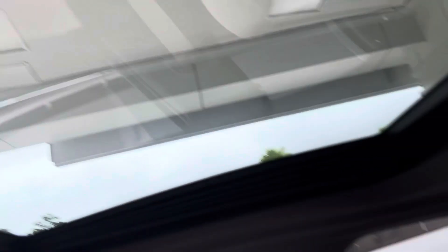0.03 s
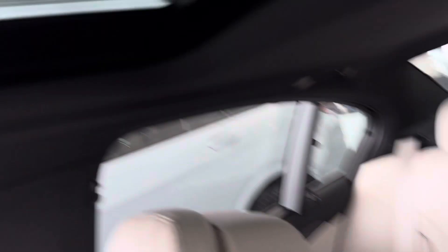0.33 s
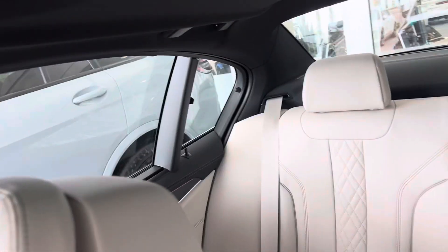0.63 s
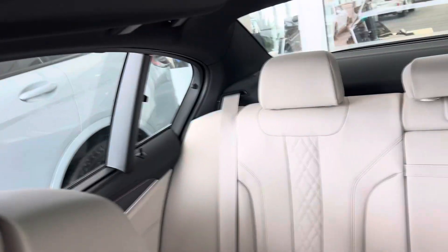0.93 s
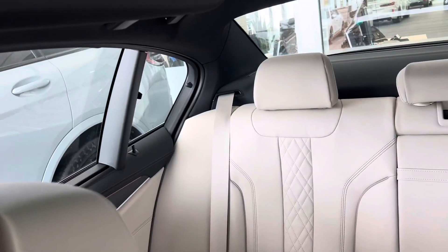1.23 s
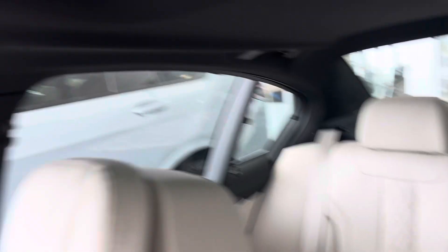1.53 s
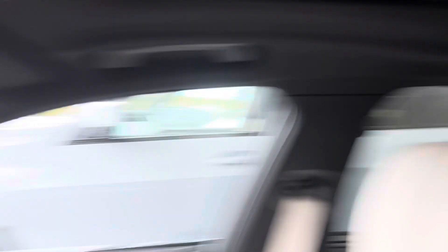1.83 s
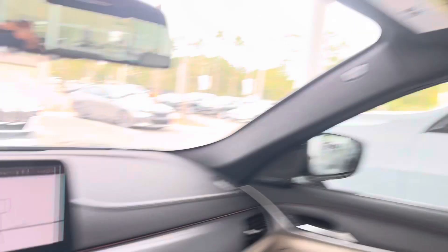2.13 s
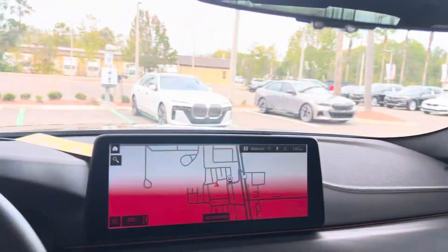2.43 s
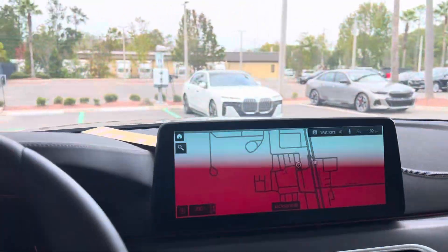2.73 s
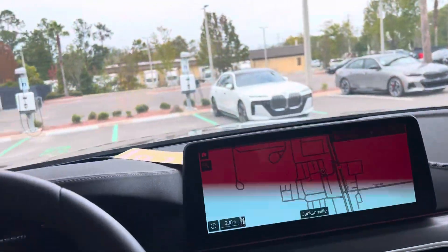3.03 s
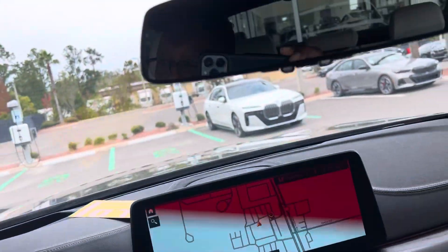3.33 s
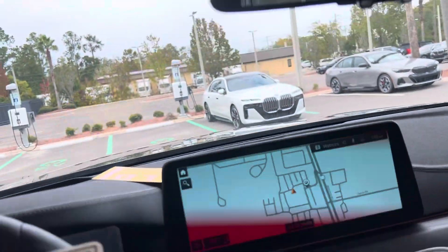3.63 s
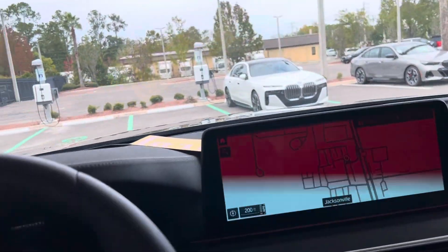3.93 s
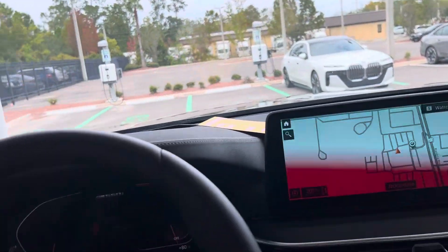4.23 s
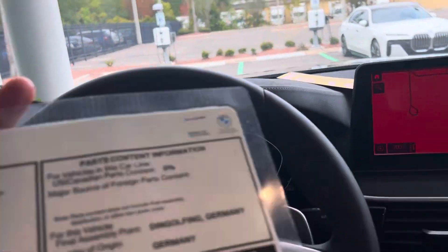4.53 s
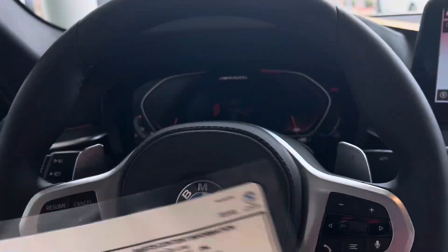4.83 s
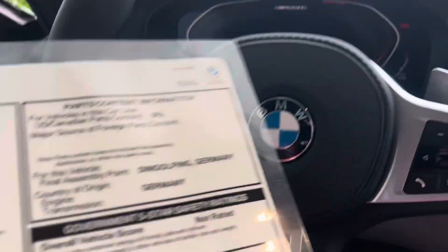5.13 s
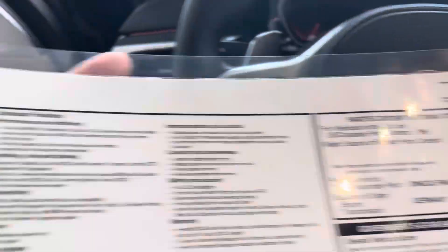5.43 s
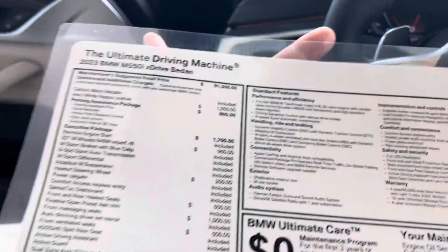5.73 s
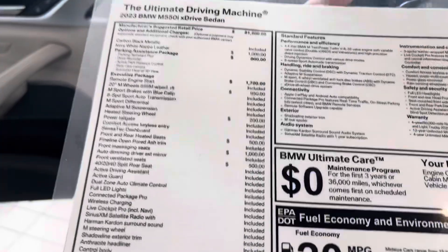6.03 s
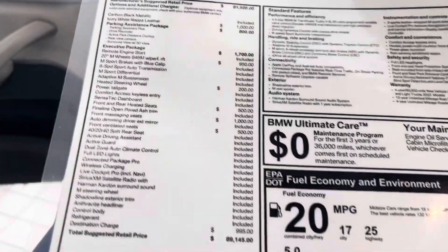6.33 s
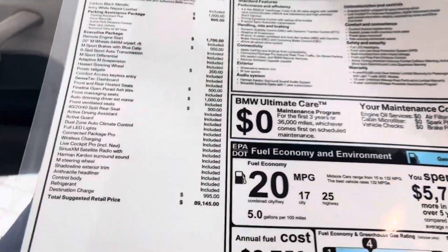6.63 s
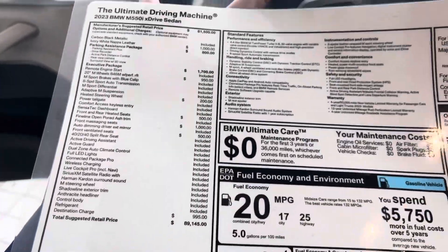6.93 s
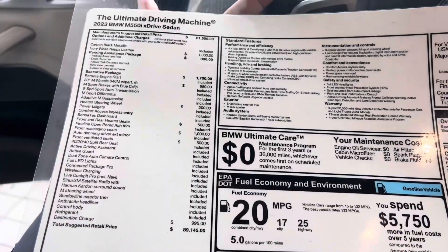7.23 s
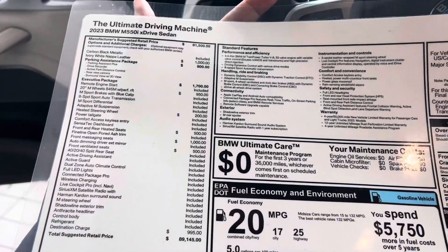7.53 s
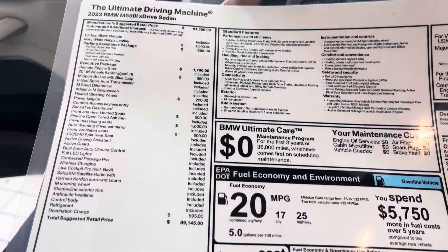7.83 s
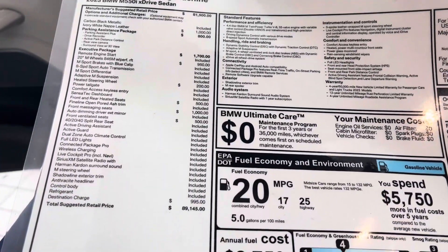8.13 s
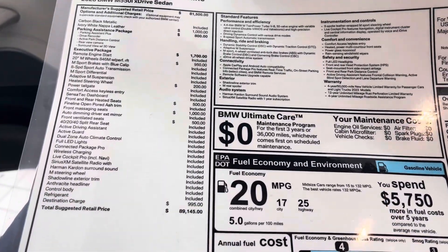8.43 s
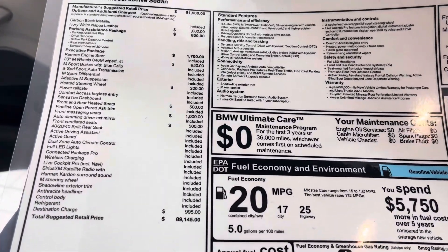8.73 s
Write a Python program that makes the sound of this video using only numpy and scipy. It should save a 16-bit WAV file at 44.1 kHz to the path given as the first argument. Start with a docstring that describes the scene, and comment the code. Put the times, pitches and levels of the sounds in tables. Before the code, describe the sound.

A parked car idles throughout, heard from inside as a low rumble with soft vent air, quiet at first and fuller after 2 seconds. Two faint sleeve swishes pass in the first second, and a seat groans softly near 1.8 seconds. From about 2 seconds a stiff laminated sheet is picked up close to the microphone, sliding and buckling in little swells of pops. The handling is loudest from 3.3 to 4.2 seconds, with crinkles, hissy slides, hard edge ticks and snaps, the sharpest near 3.8 seconds. From 4.5 to 5.5 seconds the sheet flaps in dull lumps as it bends, with brief scrapes and a crackle. A last light scrape comes around 6 seconds, as a deep cabin boom swells up. The boom peaks again near 7.3 seconds and continues with the idle until about 9 seconds, with one faint knock near the end.

```python
"""A stiff laminated sheet is picked up and handled inside a parked, idling car.
It buckles in swells of tiny pops, snaps through as bulges flip, and flaps in dull lumps as it bends.
It hisses as it slides, its hard edge scrapes and ticks, and the film crackles where fingers pinch it.
Two soft sleeve swishes and a low seat groan come first. Underneath, the engine rumbles, the cabin
booms and the vents blow. Two close microphone ports spread the scene into stereo."""
import sys
import numpy as np
from scipy import signal
from scipy.fft import rfft, irfft, next_fast_len
from scipy.io import wavfile
from scipy.ndimage import uniform_filter1d, map_coordinates

SR = 44100
rng = np.random.default_rng(int(sys.argv[2]) if len(sys.argv) > 2 else 0)


def unload_wav(signal):
    """Save mono or channel-first audio to the path in sys.argv[1] as 16-bit WAV at rate SR, clipped to [-1, 1]."""
    wavfile.write(
        sys.argv[1],
        SR,
        np.round(np.clip(np.atleast_2d(signal).T, -1, 1) * 32767).astype(np.int16),
    )


N = 396900

# idle rumble fader: time_s, level_db
RUMBLE_LEVEL = [(0, -48), (2, -49), (2.6, -41), (5.3, -35.5), (6.6, -41), (9, -43)]
# cabin boom at the moving microphone: time_s, level_db
BOOM_LEVEL = [(0, -53.5), (5.55, -59), (5.85, -35), (6.33, -35.5), (6.55, -43), (7.3, -33), (7.9, -39),
              (8.5, -40.5)]
# vent air fader: time_s, level_db
AIR_LEVEL = [(.3, -59.5), (1.2, -63), (1.8, -61.5), (2.4, -52), (6.1, -49), (9, -50)]
# flapping, louder as the sheet is bent harder: time_s, level_db
BEND_LEVEL = [(1.8, -60.5), (2.3, -44), (4.3, -51.5), (4.6, -32), (4.9, -37.5), (5.1, -35.5), (5.4, -35),
              (5.65, -56), (6.3, -48.5)]
# EQ curves for rumble, vent air, sliding and bending: frequency_hz, gain_db
RUMBLE_EQ = [(30, -43), (44, 0), (52, -7.5), (75, -4.5), (110, -11), (220, -13), (350, -25), (2000, -70.5)]
AIR_EQ = [(100, -30), (300, -2.5), (600, 0), (1000, -4.5), (1600, -3.5), (2500, -19.5), (4000, -25),
          (5800, -30), (8000, -38), (13000, -65)]
SLIDE_EQ = [(200, -18), (800, 8), (2100, 8.5), (4100, 0.5), (5500, 2.5), (7000, -1), (8500, 5.5),
            (15500, -8)]
BEND_EQ = [(40, -54), (85, 7), (160, 0), (340, -1.5), (580, -10.5), (1000, -20.5), (2500, -60)]
# the cabin's reverb time: frequency_hz, t60_s
CABIN_DECAY = [(150, 0.33), (1000, 0.1), (3000, 0.061)]
# how alike the two ports sound: frequency_hz, likeness (0 to 1)
PORT_LIKENESS = [(150, .98), (1000, .87), (2000, .72), (6000, .4), (8300, .9)]
# phase of left ahead of right: frequency_hz, lead_rad
PORT_LEAD = [(300, 0.22), (500, 0.69), (800, 1.73), (1300, 1.94), (1800, 3.88), (2250, 6.54), (3000, 7.53),
             (7000, 7.5), (8300, 4.66)]
# level of left over right: frequency_hz, balance_db
PORT_BALANCE = [(60, 1), (170, 3), (650, -2.5), (980, 2), (1700, -3), (5200, 6), (8300, 0.5)]
# the sheet's ringing modes: pitch_hz, width_hz, relative_db
SHEET_MODES = [(410, 171, -7), (960, 214, -2.5), (1160, 180, 0), (1245, 25, -1), (1320, 68, -2),
               (1710, 257, 1), (2000, 35, -3), (2260, 80, -2.5), (2680, 110, -2), (3000, 110, 2),
               (3300, 69, -3), (3580, 55, 1), (4620, 110, -1)]
# strokes of sleeve and sheet sliding: start_s, end_s, relative_db
SLIDE_STROKES = [(0.144, 0.867, -75.5), (1.683, 2.13, -68), (2.26, 2.748, -56), (2.782, 2.797, -51),
                 (3.256, 3.39, -48.5), (3.437, 3.725, -59), (3.776, 3.878, -50), (3.928, 3.939, -48.5),
                 (4.132, 4.204, -51), (4.234, 4.518, -61), (4.638, 4.792, -56), (4.838, 5, -51),
                 (5.21, 5.419, -53), (5.47, 5.612, -64.5), (5.905, 6.174, -67.5), (6.68, 6.756, -67.5)]
# two soft sleeve swishes, then the sheet's edge scraping: start_s, end_s, level_db, centre_hz
SWISHES_AND_SCRAPES = [(0.15, 0.55, -59.5, 1200), (.65, 1.0, -61.5, 1200), (2.05, 2.38, -51.5, 1300),
                       (2.45, 2.83, -49.5, 2000), (3.24, 3.42, -45.5, 2100), (4.753, 4.93, -48, 2700),
                       (4.955, 5.025, -38.5, 2500), (5.25, 5.44, -43, 3600), (5.891, 6.01, -45.5, 1600),
                       (6.03, 6.2, -54.5, 2100)]
# fingers pinching the film: start_s, end_s, level_db
FILM_PINCHES = [(3.5, 3.68, -50), (4.77, 4.87, -50)]
# ticks of the hard edge and fingertips: start_s, relative_db, pitch_hz
EDGE_TICKS = [(0.884, -46.5, 3580), (2.496, -36, 2400), (3.0704, -43, 5880), (3.42, -37.5, 2970),
              (3.523, -37, 2900), (3.5666, -37, 3120), (3.6395, -41.5, 3120), (3.767, -31.5, 5660),
              (3.766, -19.5, 3520), (4.0764, -39, 4960), (4.6411, -22, 2296), (4.6416, -25, 3430),
              (4.994, -28, 2980)]
# snaps and soft knocks of the sheet: start_s, relative_db, brightness_hz
SHEET_SNAPS = [(1.92, -43.5, 720), (1.958, -48, 770), (2.415, -32, 1080), (3.243, -34, 1540),
               (3.443, -20, 900), (3.459, -15.5, 1470), (3.7652, -5.5, 3350), (3.772, -17.5, 267),
               (3.9432, -13, 2570), (3.948, -13.5, 1670), (4.005, -17, 2730), (4.165, -21.5, 2160),
               (4.450, -24.5, 740), (4.536, -22.5, 448), (4.648, -22.5, 263), (4.964, -23.5, 890),
               (5.372, -25.5, 1490), (5.51, -34.5, 2760), (8.656, -37.5, 680)]
# a low seat groan, then the sheet's buckling swells:
# crest_s, relative_db, rise_s, brightness_hz, hollow_note_hz
GROAN_AND_BUCKLES = [(1.828, -44.5, 0.051, 198, 137), (2.421, -31, 0.012, 1040, 212),
                     (2.576, -37, 0.012, 1590, 855), (2.648, -38.5, 0.023, 1420, 885),
                     (2.875, -35, 0.027, 900, 386), (2.94, -35, 0.021, 1460, 1470),
                     (3.116, -43, 0.015, 1480, 1060), (3.185, -35, 0.06, 460, 370),
                     (3.275, -28, 0.027, 760, 250), (3.37, -29, 0.04, 820, 730),
                     (3.458, -20.5, 0.019, 1080, 430), (3.491, -19.5, 0.019, 1540, 1250),
                     (3.59, -33, 0.071, 1350, 910), (3.784, -17.5, 0.012, 1550, 1090),
                     (4.006, -22.5, 0.028, 1630, 1100), (4.09, -24, 0.024, 1700, 437),
                     (4.182, -25, 0.022, 1710, 990), (4.475, -29, 0.037, 1170, 337),
                     (4.545, -19, 0.0048, 770, 280), (4.668, -28.5, 0.019, 466, 220),
                     (5.003, -24, 0.027, 1230, 570)]

BOOM_HZ, BOOM_WANDER_HZ = 63.3, 1.148  # the cabin's lowest resonance
SLIDE_ATTACK_S, SLIDE_RELEASE_S, SLIDE_EASE_PER_S = 0.0059, 0.029, 0.71
FIZZ_HZ, FIZZ_DB, FIZZ_SLOPE = 8850, -3, .85  # highest hiss: trim at the peak, extra dB lost per dB below
DRIFT_SHARE, DRIFT_RATE_HZ = .008, 9  # depth and speed of the rasp's pitch drift
RASP_REACH = 0.39  # spread of modes around a rasp's centre, as natural log of the pitch ratio
TICK_NOTE_DB, TICK_NOTE_S = -17, .008  # the note that lingers under a click, and its decay
HOLLOW_DB, HOLLOW_Q, HOLLOW_GLIDE = 3, 3.5, .08  # a swell's note; glide is a share of pitch either way
SWELL_RELAX = 1.42  # a swell's fall time over its rise time
TOP_HZ, LOW_CUT_HZ = 15900, 36.0


def amp(db):
    """Decibels to gain."""
    return 10 ** (np.asarray(db) / 20)


def unit(x):
    """Scale to rms 1."""
    return x / np.sqrt(np.mean(x ** 2) + 1e-20)


def along(points, hz):
    """Read (frequency_hz, value) points on a log axis."""
    knots_hz, values = np.transpose(points)
    return np.interp(np.log(hz + 1), np.log(knots_hz + 1), values)


def fader(points):
    """Read (time_s, value) points at every sample."""
    return np.interp(np.arange(N) / SR, *np.transpose(points))


def gate(points):
    """Open for the time that a fader's points cover, with soft ends."""
    t = np.arange(N) / SR
    return uniform_filter1d(((t > points[0][0]) & (t < points[-1][0])) * 1.0, size=2000)


def wobble(rate_hz):
    """A smooth random curve with rate_hz knots a second."""
    knots = rng.standard_normal(int(N * rate_hz / SR) + 4)
    return map_coordinates(knots, [np.arange(N) * rate_hz / SR])


def filtered(x, response):
    """Apply a complex frequency response."""
    size = next_fast_len(N + SR // 2)
    return irfft(rfft(x, size) * response(np.fft.rfftfreq(size, 1 / SR)), size)[..., :N]


def coloured(x, eq):
    """Apply an EQ curve and scale to rms 1."""
    return unit(filtered(x, lambda hz: amp(along(eq, hz))))


def dull(x, hz, order=4):
    """Roll off the treble above hz."""
    return signal.sosfilt(signal.butter(order, min(hz, SR / 2 - 1), fs=SR, output='sos'), x)


def slips(shape, rate_hz, spread_db):
    """Grain: tiny random impulses of uneven size, at rms 1."""
    hits = rng.random(shape) < rate_hz / SR
    polarity = np.sign(rng.standard_normal(shape))
    sizes = amp(spread_db * np.clip(rng.standard_normal(shape), -2, 2))
    return unit(hits * polarity * sizes)


def add(track, start_s, sound):
    """Mix a sound into a track."""
    part = track[:, round(start_s * SR):][:, :sound.shape[1]]
    part += sound[:, :part.shape[1]]


def cabin(x, wet_db):
    """Direct sound and a short cabin tail; rows: what the ports share, what differs between them."""
    hz, t, noise = signal.stft(rng.standard_normal((2, SR // 5)), SR, nperseg=128)
    decay = amp(-60 * t / along(CABIN_DECAY, hz)[:, None])
    tail = signal.istft(noise * decay, SR, nperseg=128)[1]
    echo = amp(wet_db) * tail / np.linalg.norm(tail[0])
    echo[0, 0] += 1
    return signal.fftconvolve(x[None], echo / np.linalg.norm(echo, axis=1, keepdims=True), axes=1)


def ports(field):
    """Two microphone ports turn shared and differing sound into left and right, apart in phase and level."""
    def width(hz):
        angle = np.arccos(np.clip(along(PORT_LIKENESS, hz), 0, 1)) / 2
        return np.array([np.cos(angle), np.sin(angle)])

    def pan(hz):
        half = np.array([[.5], [-.5]])
        return amp(half * along(PORT_BALANCE, hz)) * np.exp(1j * half * along(PORT_LEAD, hz))

    shared, differing = filtered(field, width)
    return filtered(np.array([shared + differing, shared - differing]), pan)


def car():
    """The bed: idle rumble, vent air and a boom that swells as the microphone moves through the cabin."""
    rumble = amp(fader(RUMBLE_LEVEL)) * coloured(rng.standard_normal((2, N)), RUMBLE_EQ)
    air = amp(fader(AIR_LEVEL) + 0.97 * wobble(8.6)) * coloured(rng.standard_normal((2, N)), AIR_EQ)
    phase = 2 * np.pi * np.cumsum(BOOM_HZ + BOOM_WANDER_HZ * wobble(12)) / SR
    boom = np.sqrt(2) * amp(fader(BOOM_LEVEL) + 0.95 * wobble(3.0)) * np.sin(phase)
    return rumble + air + np.outer([1, 0], boom)


def sheet_ring(x, ring_db):
    """The laminate adds its modes to a push: each is a damped cosine."""
    t = np.arange(SR // 12) / SR
    ring = 0
    for hz, width_hz, db in SHEET_MODES:
        height = amp(db + ring_db) * 2 * np.pi * width_hz / SR
        ring += height * np.exp(-np.pi * width_hz * t) * np.cos(2 * np.pi * hz * t)
    return x + signal.oaconvolve(x, ring[None], axes=1)[:, :N]


def stroke_envelope():
    """Each sliding stroke rises, holds and dies away; long ones ease in and out more slowly."""
    t, power = np.arange(N) / SR, np.zeros(N)
    for start, end, db in SLIDE_STROKES:
        ease_s = SLIDE_EASE_PER_S * (end - start) ** 2
        before = np.maximum(start - t, 0) / (SLIDE_ATTACK_S + ease_s)
        after = np.maximum(t - end, 0) / (SLIDE_RELEASE_S + ease_s)
        power += (amp(db) * np.exp(-np.minimum(before + after, 20))) ** 2
    return np.sqrt(power)


def sliding():
    """Cloth and smooth plastic rub: fine slips and coarser catches ring the sheet."""
    catches = .6 * slips((2, N), rate_hz=320, spread_db=5)
    stutter_db = 1.7 * wobble(40)
    friction = rng.standard_normal((2, N)) + catches
    rub = coloured(sheet_ring(friction, ring_db=-0.5), SLIDE_EQ)
    envelope = stroke_envelope()
    # the highest hiss is heard mainly in the loudest strokes
    fizz = filtered(rub, lambda hz: hz ** 8 / (hz ** 8 + FIZZ_HZ ** 8))
    fizz_gain = amp(FIZZ_DB) * (envelope / envelope.max()) ** FIZZ_SLOPE
    return amp(8.0 + stutter_db) * envelope * (rub + (fizz_gain - 1) * fizz)


def drifting(x):
    """Pitch wanders up and down a little."""
    playhead = np.arange(N) + DRIFT_SHARE * SR / DRIFT_RATE_HZ * wobble(DRIFT_RATE_HZ)
    return np.array([map_coordinates(row, [playhead]) for row in x])


def swishes_and_scrapes():
    """A sleeve, then the sheet's edge, catches and slips: a fine rasp coloured by modes near one pitch."""
    track = np.zeros((2, N))
    for start, end, db, centre_hz in SWISHES_AND_SCRAPES:
        stroke = np.sqrt(np.hanning(round((end - start) * SR)))
        grain = slips((2, len(stroke)), rate_hz=550, spread_db=6.5)
        rasp = 0
        for hz, width_hz, mode_db in SHEET_MODES:
            mode = signal.iirpeak(hz, hz / (3 * width_hz), fs=SR)
            ringing = signal.lfilter(*mode, signal.lfilter(*mode, grain))
            nearness = np.exp(-(np.log(hz / centre_hz) / RASP_REACH) ** 2)
            rasp += nearness * amp(mode_db) ** 2 * ringing
        add(track, start, amp(db) * stroke * unit(rasp))
    return drifting(track)


def crackles():
    """Separate crisp crackles run through the pinched film."""
    track = np.zeros((2, N))
    for start, end, db in FILM_PINCHES:
        pops = slips(round((end - start) * SR), rate_hz=140, spread_db=4)
        crackle = unit(dull(pops, hz=5000, order=1))
        add(track, start, amp(db) * cabin(crackle, wet_db=-2))
    return track


def ticks():
    """The hard edge clicks on fingers and trim and rings briefly; nearby surfaces scatter each click."""
    track, t = np.zeros((2, N)), np.arange(SR // 20) / SR
    for start, db, hz in EDGE_TICKS:
        decay = np.exp(-t / 0.001) + amp(TICK_NOTE_DB) * np.exp(-t / TICK_NOTE_S)
        ring = np.sin(2 * np.pi * hz * t) * decay
        crack = 0.36 * dull(rng.standard_normal(len(t)), hz=12000, order=2) * np.exp(-t / 0.0019)
        add(track, start, amp(db) * cabin(ring + crack, wet_db=-5))
    return amp(6.5) * track


def bending():
    """The held sheet flaps in slow, dull lumps, just left of the microphone."""
    shared, differing = coloured(slips((2, N), rate_hz=510, spread_db=2.5), BEND_EQ)
    side = np.array([[1], [-1]])
    lumps = shared + 0.24 * side * differing
    return amp(fader(BEND_LEVEL) + 0.99 * side) * gate(BEND_LEVEL) * lumps


def snaps():
    """A bulge flips through at once: one push and a brief crackle ring the sheet."""
    track, t = np.zeros((2, N)), np.arange(SR // 20) / SR
    for start, db, bright_hz in SHEET_SNAPS:
        push = 0.13 * rng.standard_normal(len(t)) * np.exp(-t / 0.0021)
        push[0] += 1
        push = dull(push, bright_hz, order=6)
        # a duller push lasts longer, so it carries more energy at the same height
        push *= amp(db) * np.sqrt(SR / bright_hz) / np.linalg.norm(push)
        add(track, start, cabin(push, wet_db=-1))
    # the soft laminate swallows the top of every snap
    return dull(sheet_ring(track, ring_db=6), hz=3400, order=12)


def hollow_note(pops, hz, tightness):
    """A flexing surface adds a hollow note that glides up as tightness goes from 0 to 1."""
    slack = signal.lfilter(*signal.iirpeak(hz * (1 - HOLLOW_GLIDE), HOLLOW_Q, fs=SR), pops)
    taut = signal.lfilter(*signal.iirpeak(hz * (1 + HOLLOW_GLIDE), HOLLOW_Q, fs=SR), pops)
    return pops + amp(HOLLOW_DB) * (np.sqrt(1 - tightness) * slack + np.sqrt(tightness) * taut)


def groan_and_buckles():
    """The seat groans low, then the sheet buckles: swells of small pops, each brightest at its crest."""
    track, t = np.zeros((2, N)), np.arange(-SR // 6, SR // 4) / SR
    for crest_s, db, rise_s, bright_hz, hollow_hz in GROAN_AND_BUCKLES:
        swell = np.exp(-np.abs(t) / np.where(t < 0, rise_s, SWELL_RELAX * rise_s))
        crisp, soft = slips((2, len(t)), rate_hz=1000, spread_db=2)
        pops = swell * (np.sqrt(swell) * dull(crisp, bright_hz) + 0.98 * dull(soft, 0.55 * bright_hz))
        tightness = (1 + np.tanh(t / rise_s)) / 2
        flex = cabin(hollow_note(pops, hollow_hz, tightness), wet_db=-3.5)
        gain = amp(db) * np.linalg.norm(swell) / (np.linalg.norm(flex[0]) + 1e-9)
        add(track, crest_s + t[0], gain * flex)
    return dull(sheet_ring(track, ring_db=-1.5), hz=3440, order=8)


def scene():
    """The handled sheet over the bed of the idling car."""
    field = car() + sliding() + swishes_and_scrapes() + crackles()
    return ports(field + groan_and_buckles() + snaps() + ticks()) + bending()


def record(dry):
    """The microphone sheds the deepest bass, and nothing passes above the band limit."""
    return filtered(dry, lambda hz: (hz < TOP_HZ) * hz ** 4 / np.sqrt(hz ** 8 + LOW_CUT_HZ ** 8))


dry = scene()
out = record(dry)
unload_wav(out)
```